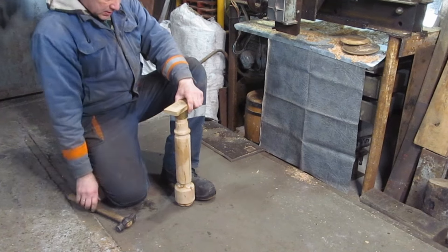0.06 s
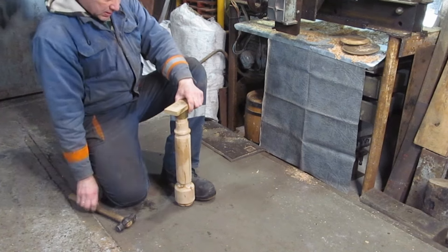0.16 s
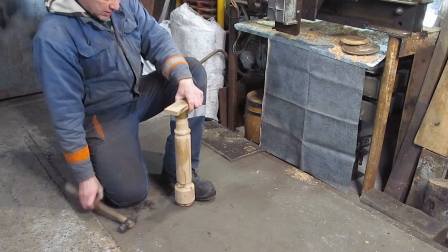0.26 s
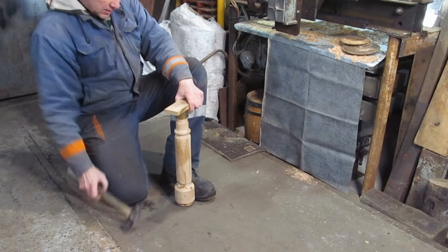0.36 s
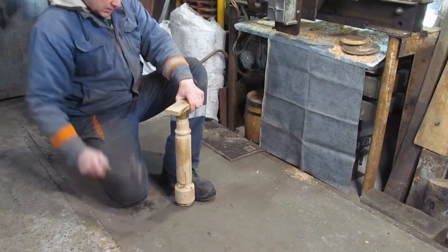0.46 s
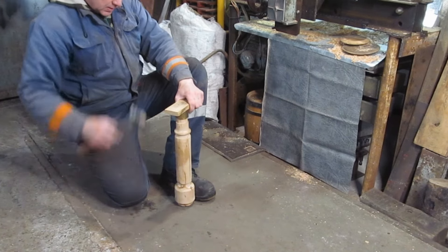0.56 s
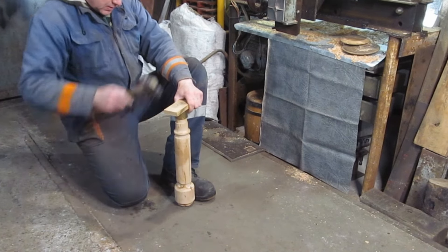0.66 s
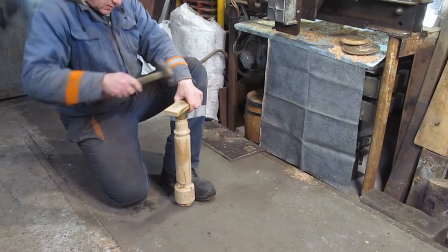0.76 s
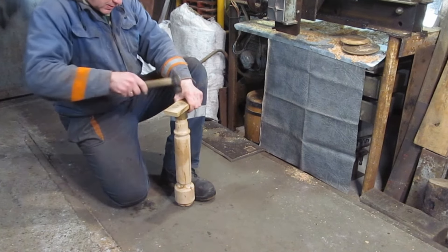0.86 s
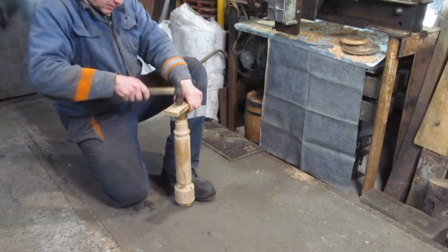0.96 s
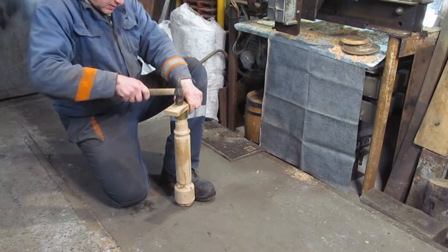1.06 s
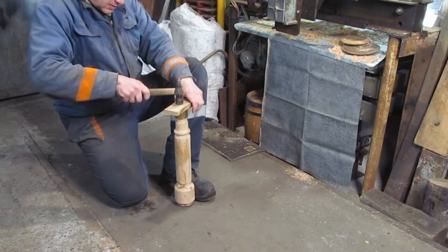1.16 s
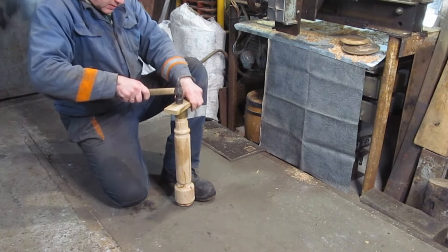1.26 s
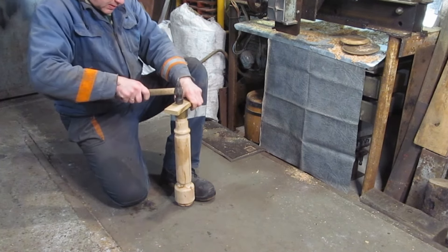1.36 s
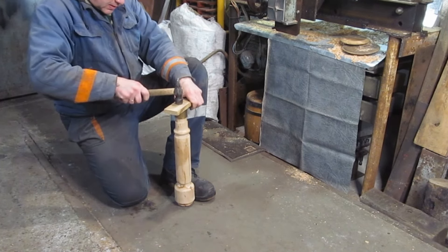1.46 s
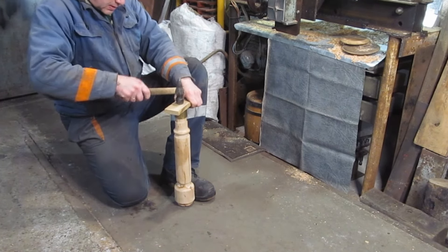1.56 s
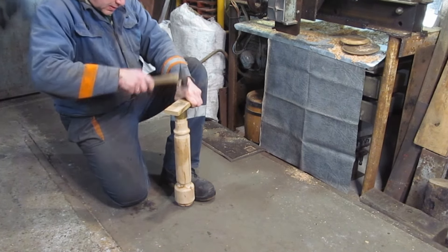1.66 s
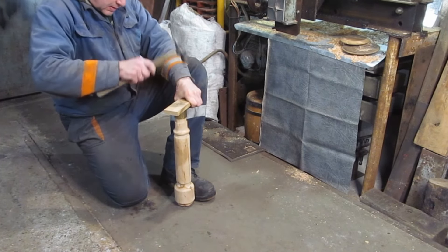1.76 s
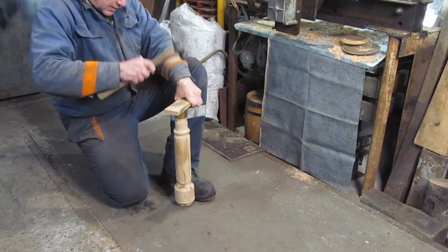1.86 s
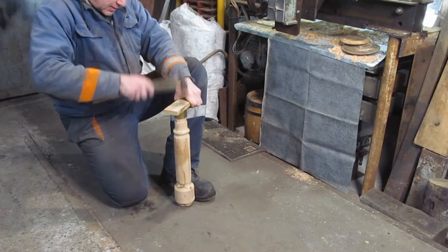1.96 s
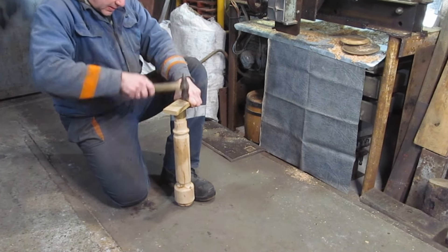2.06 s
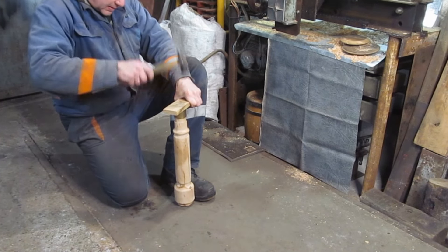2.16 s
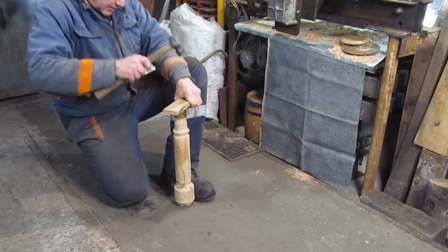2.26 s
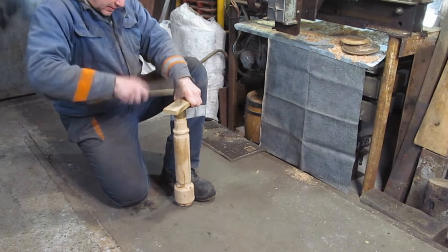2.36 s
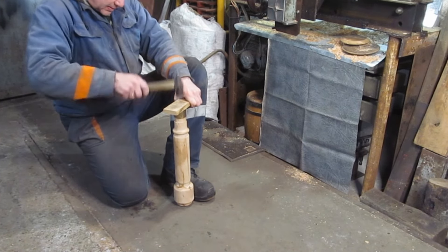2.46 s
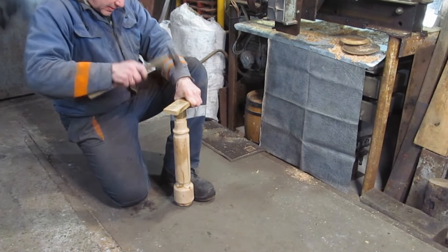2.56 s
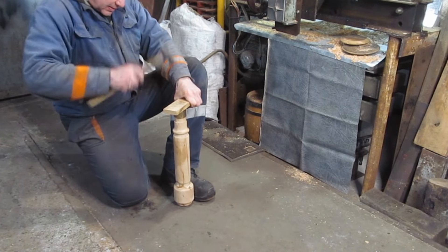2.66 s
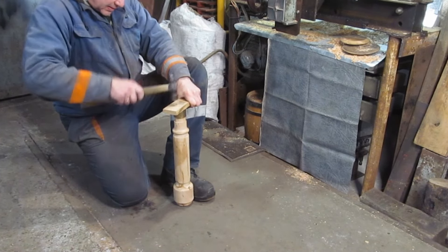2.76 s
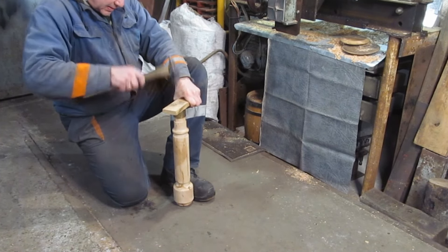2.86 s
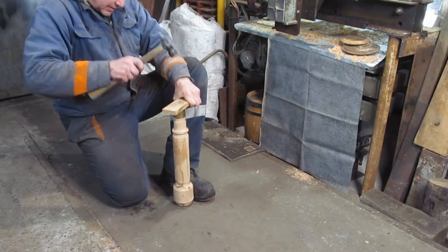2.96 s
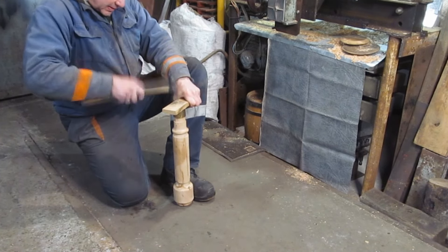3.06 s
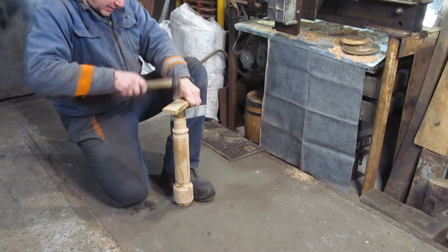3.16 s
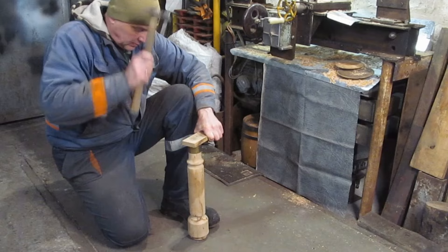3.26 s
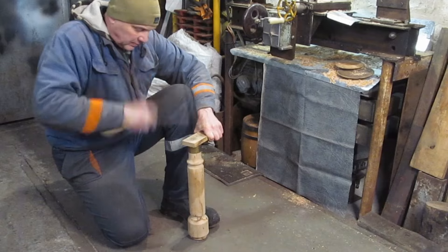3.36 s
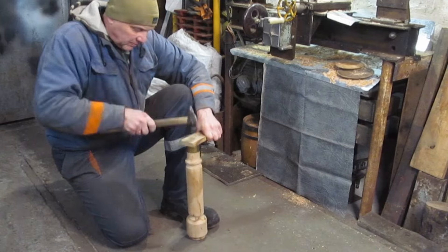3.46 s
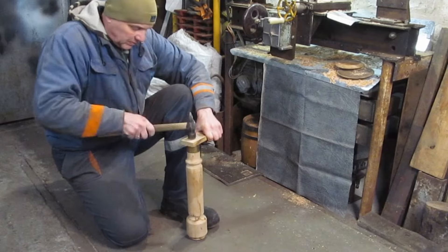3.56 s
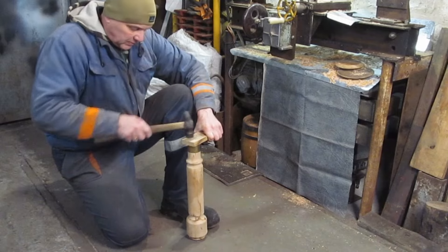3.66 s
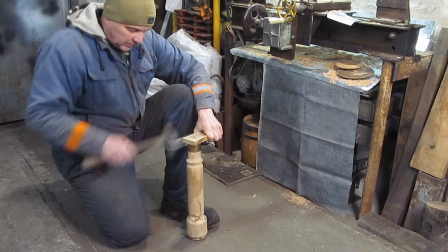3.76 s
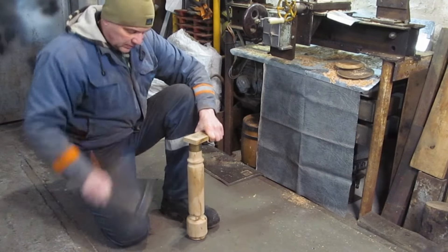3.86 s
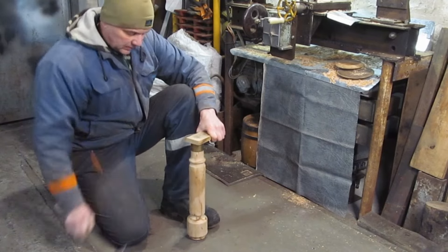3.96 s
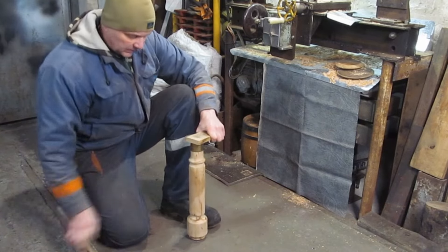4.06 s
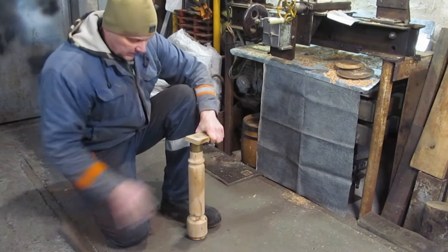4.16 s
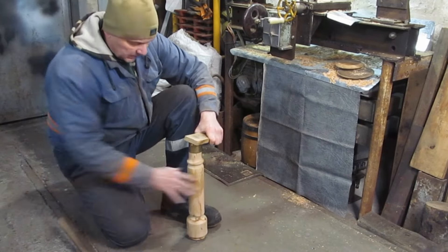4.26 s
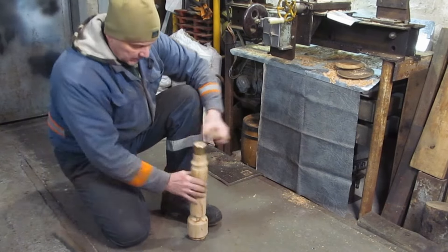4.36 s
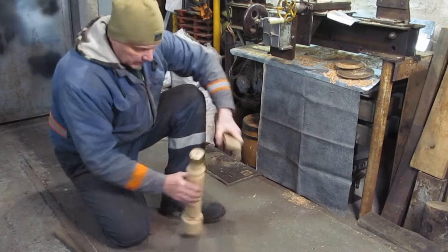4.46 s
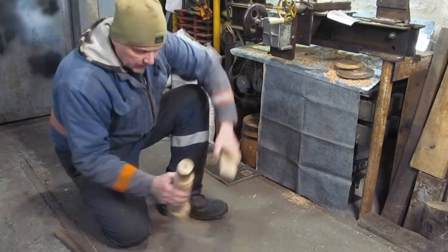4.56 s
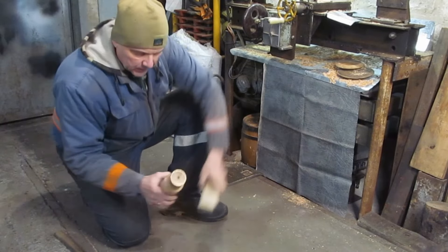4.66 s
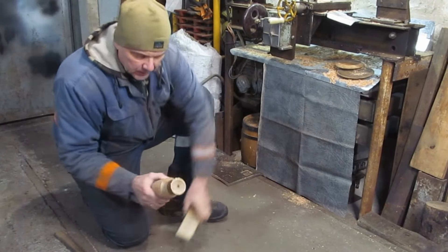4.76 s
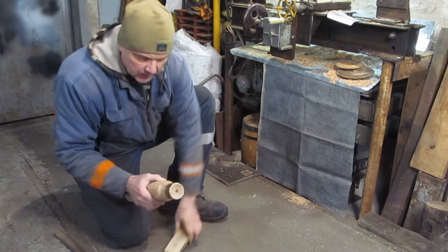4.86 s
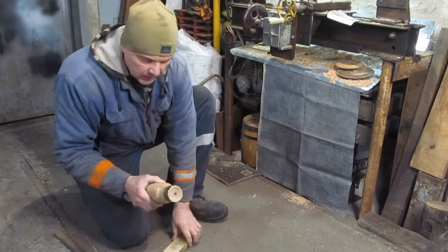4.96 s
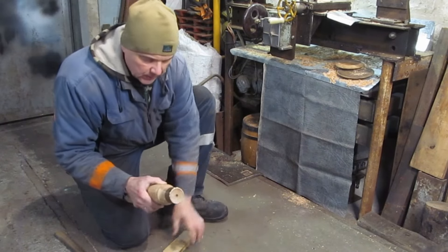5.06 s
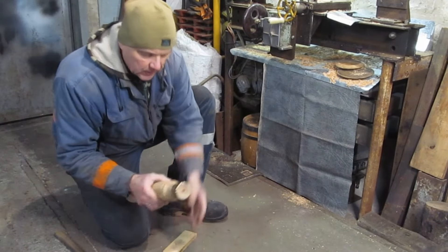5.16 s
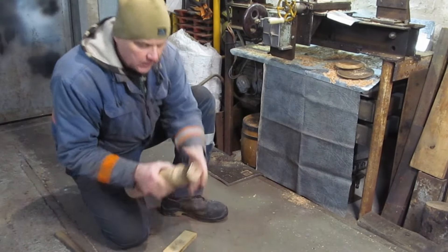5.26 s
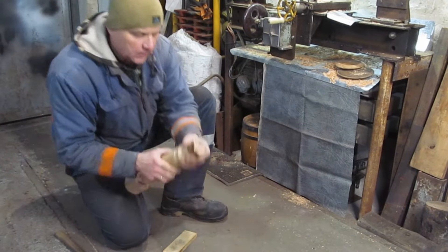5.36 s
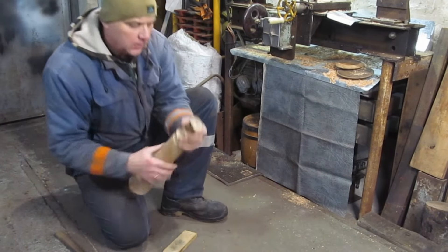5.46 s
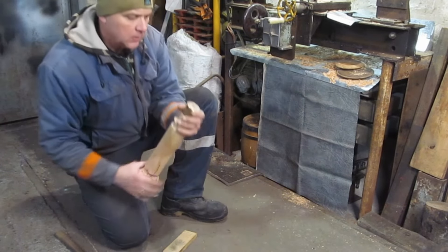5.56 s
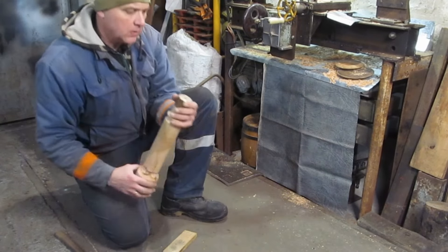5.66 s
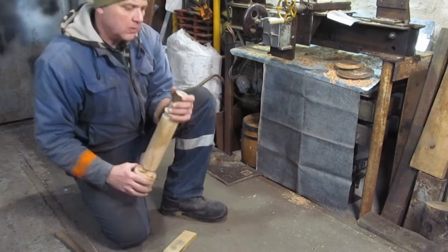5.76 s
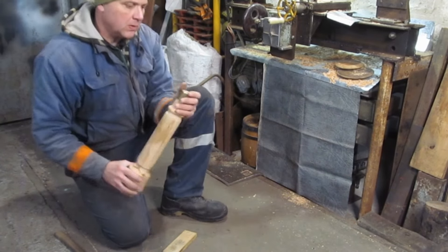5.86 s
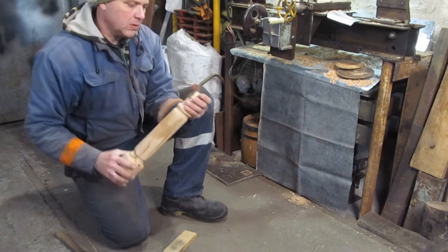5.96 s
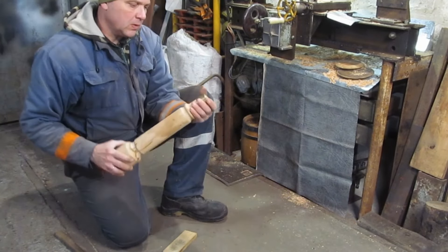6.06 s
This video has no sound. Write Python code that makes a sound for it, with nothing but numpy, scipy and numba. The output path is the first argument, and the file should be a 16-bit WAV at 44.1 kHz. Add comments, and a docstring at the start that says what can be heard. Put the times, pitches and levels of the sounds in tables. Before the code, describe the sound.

A gritty metal scrape, then six hammer blows on wood: the first softer, a pause, then five loud, dry cracks with short room echoes and a quick rebound after the last. The hammer is laid on concrete with clacks, the post's foot knocks, a small block drops and bounces, and fingers tap and brush wood. Faint hiss and far rumble, heard from a few metres.

```python
"""Hammering a wooden block in a garage

A worker drags a hammer off a concrete floor and drives six blows into a wooden block on a turned post,
then lays the hammer down, tips the post over, drops the block and handles the post. Knocks are damped
modes plus a noisy crack; rubbing is noise grains through ringing modes or a hiss band. A small cluttered
garage answers with diffuse echoes, over hiss and far rumble. The stereo microphone stands a few metres
away; its recorder clips the blows and turns its gain down after loud sound.
"""
import sys
import numpy as np
from scipy import signal
from scipy.fft import rfft, irfft, next_fast_len
from scipy.io import wavfile
from scipy.ndimage import uniform_filter1d
from numba import njit

SR = 44100
rng = np.random.default_rng(int(sys.argv[2]) if len(sys.argv) > 2 else 0)


def inscribe(sig):
    """Save sig as 16-bit PCM at rate SR to the path in sys.argv[1].

    A 1-D sig is mono; a 2-D sig holds one channel per row.
    Samples are clipped to [-1, 1] before scaling.
    """
    pcm = np.round(np.clip(np.atleast_2d(sig).T, -1, 1) * 32767)
    wavfile.write(sys.argv[1], SR, pcm.astype(np.int16))


N = 269835  # samples


def undb(db):
    """Amplitude factor of a level in dB."""
    return 10 ** (np.asarray(db) / 20)


def over_hz(table, hz):
    """Value of a (frequency_hz, value) table on a log-frequency axis."""
    table_hz, values = np.transpose(table)
    return np.interp(np.log(hz), np.log(table_hz), values)


def over_time(table):
    """Value of a (time_s, value) curve at every sample."""
    return np.interp(np.arange(N) / SR, *np.transpose(table))


def unit(x):
    """Scale to an RMS of 1."""
    return x / np.sqrt(np.mean(x ** 2))


# How alike left and right are: frequency_hz, correlation (0-1)
LEFT_RIGHT_LIKENESS = [(60, .6), (200, .95), (600, .88), (1500, .6), (3000, .45), (8000, .45), (16000, .3)]


def stereo_bands(size, shape):
    """Half-octave noise bands, partly alike left and right, each scaled by shape(hz)."""
    bin_hz = np.fft.rfftfreq(size, 1 / SR)
    out = np.zeros((2, size))
    noise = rfft(rng.standard_normal((2, size)))
    for hz in 25 * 2 ** np.arange(0, 10, .5):
        octaves_off = np.abs(np.log2(bin_hz / hz + 1e-9))
        mid, side = irfft(noise * np.clip(1 - octaves_off / .5, 0, 1), size)
        like = np.clip(over_hz(LEFT_RIGHT_LIKENESS, hz), 0, 1)
        out += shape(hz) * (np.sqrt(1 + like) * mid + np.sqrt(1 - like) * side * np.array([[1], [-1]]))
    return out


# Colour of the background hiss: frequency_hz, relative density_db
HISS_COLOUR = [(15, -38), (25, -11.5), (410, -9), (726, -1.5), (902, -10), (979, -5.5), (1220, -2),
               (1930, -9.5), (3700, -12), (7920, -23), (9080, -24), (15200, -29), (16500, -53)]
HISS_DB = -62.5  # RMS, before the left-right balance and the recorder's gain
# Far rumble coming and going: time_s, level_db
RUMBLE_LEVEL = [(0, -63), (.9, -71.5), (2, -68), (3.9, -60.5), (4.7, -70.5), (5.4, -79), (6.12, -100)]


def background():
    """Smooth hiss, and a far rumble centred on 150 Hz that comes and goes."""
    size = next_fast_len(N)
    hiss = unit(stereo_bands(size, lambda hz: undb(over_hz(HISS_COLOUR, hz))))[:, :N]
    rumble = unit(stereo_bands(size, lambda hz: np.exp(-np.log(hz / 150) ** 2 / .8)))[:, :N]
    return undb(HISS_DB) * hiss + undb(over_time(RUMBLE_LEVEL)) * rumble


# Decay of the garage: frequency_hz, t60_s
ROOM_DECAY = [(60, 0.87), (150, 0.43), (400, 0.33), (1000, 0.39), (2000, 0.34), (4000, 0.31), (7000, 0.37),
              (11000, 0.05), (16000, 0.033)]
# Colour of its echoes at their start: frequency_hz, relative level_db
ECHO_COLOUR = [(60, -5.5), (200, -1), (600, -6), (1500, -6), (3000, -5), (6000, -13.5), (10000, -13.5),
               (16000, -24.5)]
TAILS_STOP_S = 3.256  # echoes of everything before this moment stop short here


def garage(dry):
    """Diffuse echoes build up within a few ms and die sooner in the treble."""
    t = np.arange(SR) / SR
    tail = stereo_bands(SR, lambda hz: undb(over_hz(ECHO_COLOUR, hz) - 60 * t / over_hz(ROOM_DECAY, hz)))
    tail = tail * np.clip((t - .002) / 0.0014, 0, 1) * undb(-22.0)
    before = np.arange(N) < TAILS_STOP_S * SR
    fade = np.clip((TAILS_STOP_S + .006 - np.arange(N) / SR) / .012, 0, 1)
    early = signal.fftconvolve((dry * before)[None], tail, axes=1)[:, :N]
    late = signal.fftconvolve((dry * ~before)[None], tail, axes=1)[:, :N]
    return early * fade + late


def ring(x, modes):
    """Sum of damped resonances, neighbours in opposite sign."""
    out = 0
    for k, (hz, width_hz, db) in enumerate(modes):
        r = np.exp(-np.pi * width_hz / SR)
        w = 2 * np.pi * hz / SR
        mode = signal.lfilter([0, np.sin(w)], [1, -2 * r * np.cos(w), r * r], x)
        out = out + (-1) ** k * undb(db) * mode
    return out


def grains(spread_db):
    """Dense clicks of very uneven size."""
    return rng.standard_normal(N) * undb(spread_db * rng.exponential(size=N))


def strokes(table, attack_s, release_db_s):
    """Gain of rubbing strokes: a ramp up, a hold, a fade in dB per s."""
    t = np.arange(N) / SR
    out = 0
    for start_s, hold_s, db in table:
        fading_s = np.maximum(t - start_s - attack_s - hold_s, 0)
        out = out + np.clip((t - start_s) / attack_s, 0, 1) * undb(db - release_db_s * fading_s)
    return out


def rubbing_hiss():
    """Skin or cloth over a surface: uneven grains heard from 2.5 to 11 kHz."""
    band = signal.butter(2, [2500, 11000], "bandpass", fs=SR, output="sos")
    return unit(signal.sosfilt(band, grains(3.6)))


# Sleeve swishing as the arm moves: start_s, hold_s, level_db
SLEEVE_STROKES = [(0, 0.44, -67.5), (.45, .14, -65), (.62, .27, -72), (2.275, 0.036, -64),
                  (2.63, 0.012, -69.5), (3.895, 0.026, -71)]


def sleeve():
    """Cloth hisses as the arm moves."""
    return strokes(SLEEVE_STROKES, 0.0088, 900) * rubbing_hiss()


# Hands over the wood: start_s, hold_s, level_db
HAND_STROKES = [(5.243, 0.019, -72), (5.305, .04, -68), (5.365, .022, -70), (5.437, 0.058, -56.5),
                (5.545, 0.029, -67), (5.698, 0.049, -69.5), (5.91, 0.17, -89)]
# Swells of a hollow tone near 1 kHz: start_s, hold_s, level_db
HOLLOW_SWELLS = [(5.25, 0.034, -76), (5.52, 0.056, -66.5), (5.82, 0.068, -73), (5.99, .13, -83)]
# Ringing of the lifted, free post: pitch_hz, width_hz, level_db
LIFTED_POST_MODES = [(968, 43, -6), (1518, 360, 0.5), (2116, 43, 5.5), (2730, 350, -3.5), (6550, 900, -11)]


def hands():
    """Skin hisses over the wood and wakes its ring, while a hollow tone swells."""
    rub = rubbing_hiss() + undb(-8.5) * unit(ring(grains(2.0), LIFTED_POST_MODES))
    hollow = unit(ring(grains(1.8), [(1034, 21, 0)]))
    return strokes(HAND_STROKES, 0.011, 440) * rub + strokes(HOLLOW_SWELLS, 0.018, 330) * hollow


# Hammer dragged free: start_s, hold_s, level_db
DRAG_STROKES = [(.18, .08, -44), (.33, .05, -59.5)]
# Head first sliding, fingers on the handle: start_s, hold_s, level_db
SCRAPE_STROKES = [(.022, .028, -49.5), (.085, .04, -52)]
# Hammer ringing on the concrete: pitch_hz, width_hz, level_db
HAMMER_MODES = [(163, 98, -10.5), (280, 94, -16), (458, 92, -4.5), (1100, 310, 2), (1880, 102, 2.5),
                (3128, 89, 0.5), (3967, 420, -9), (4900, 200, -8)]
# Hammer ringing under the hand: pitch_hz, width_hz, level_db
HELD_HAMMER_MODES = [(490, 61, 2), (890, 62, -9), (2120, 60, 0), (3250, 80, -14), (3520, 110, -9)]


def hammer_drag():
    """Grit on the floor excites the ring of the hammer."""
    rounded_grit = signal.lfilter([1], [1, -.9], grains(5.1))  # the weight rounds the grit
    drag = strokes(DRAG_STROKES, 0.024, 400) * unit(ring(rounded_grit, HAMMER_MODES))
    return drag + strokes(SCRAPE_STROKES, 0.0137, 450) * unit(ring(grains(3.9), HELD_HAMMER_MODES))


def knock(modes, contact_ms, crack_db, crush_ms, grit):
    """One contact, direct peak 1. Rows: direct sound, then its ring and crack averaged over all directions."""
    t = np.arange(SR // 5) / SR
    # the surface gives way for a few ms
    crush = rng.standard_normal((2, len(t))) * np.exp(-(t * 1000 / crush_ms) ** 4)
    push = 1. * (t == 0)
    keep = np.exp(-2 * np.pi * 1000 / (SR * max(contact_ms, .02)))  # longer contact, duller sound
    forces = [push + grit * crush[0], push, crush[1], push]
    parts = signal.lfilter([1], np.poly([keep] * 3), forces)
    parts[:2] = ring(parts[:2], modes)
    parts[2:] = np.diff(parts[2:], prepend=0)  # the surface radiates its acceleration
    energy = np.sum(parts ** 2, axis=1, keepdims=True)
    parts = parts / np.sqrt(energy) * undb([[0], [0], [crack_db], [crack_db]])
    direct = parts[0] + parts[2]
    return np.array([direct, parts[1], parts[3]]) / np.abs(direct).max()


def add(track, s, sound):
    """Mix a sound into the track from second s on."""
    i = int(s * SR)
    track[:, i:i + sound.shape[1]] += sound[:, :N - i]


SPOT_SPREAD = .2  # random shift of each mode at a new contact spot, as a share of its width
TAP_CRACK_GROWTH = 0.28  # extra crack dB per dB of contact level


def taps(table, modes, crack_db, growth, crush_ms, grit, room_db):
    """Light contacts of one object; the crack's share changes by growth dB per dB of level."""
    out = np.zeros((3, N))
    for s, db, contact_ms in table:
        shifted = np.array(modes, dtype=float)
        shift = np.clip(rng.standard_normal(len(modes)), -2, 2)
        shifted[:, 0] += SPOT_SPREAD * shifted[:, 1] * shift
        add(out, s, undb(db) * knock(shifted, contact_ms, crack_db + growth * db, crush_ms, grit))
    return out * undb([[0], [room_db], [room_db]])


# Fingers tapping the lifted post: start_s, peak level_db, contact_ms
FINGER_CONTACTS = [(5.127, -52.5, .14), (5.368, -44.5, .14), (5.380, -47, 0.17), (5.535, -27.5, 0.21)]


def finger_taps():
    """Fingers wake the modes of the free post; softer taps have a larger share of crack."""
    return taps(FINGER_CONTACTS, LIFTED_POST_MODES, -39.5, -0.96, 2.8, 0.11, -13.5)


# Loose block landing and bouncing: start_s, peak level_db, contact_ms
BLOCK_CONTACTS = [(4.824, -12, 0.48), (4.875, -7.5, 0.56), (4.888, -8.5, 0.32), (4.901, -19, 0.38),
                  (4.922, -34, .36), (4.940, -19.5, 0.11)]
# Ringing of the loose block: pitch_hz, width_hz, level_db
BLOCK_MODES = [(666, 630, -22), (1010, 550, -8.5), (1584, 210, -5.5), (1900, 88, -5), (2098, 36, -3.5),
               (2215, 38, 2), (2836, 180, 2), (3270, 520, 1.5), (5030, 1700, 4.5)]
GRIP_DAMPING = 5.  # the fingers widen the block's modes this many times at its first landing


def block():
    """First landing damped by the fingers, then free bounces."""
    gripped = np.array(BLOCK_MODES) * [1, GRIP_DAMPING, 1]
    landing = taps(BLOCK_CONTACTS[:1], gripped, -5.5, TAP_CRACK_GROWTH, 0.73, 0.64, -3)
    return landing + taps(BLOCK_CONTACTS[1:], BLOCK_MODES, -11.5, TAP_CRACK_GROWTH, 0.69, 0.32, -4.5)


# Foot of the post landing on the concrete: start_s, peak level_db, contact_ms
POST_CONTACTS = [(4.322, -6, 0.17), (4.329, -7, 0.25), (4.431, -18.5, 0.63), (4.494, -31.5, 1),
                 (4.528, -33, 1)]
# Ringing of the tipped post: pitch_hz, width_hz, level_db
POST_MODES = [(655, 110, -12), (823, 246, -5.5), (1920, 650, 3), (3020, 460, 2), (5260, 850, -2.5)]


def post():
    """The foot lands, then rocks softly to rest."""
    return taps(POST_CONTACTS, POST_MODES, -7.5, TAP_CRACK_GROWTH, 0.54, .12, -5)


# Hammer touching the concrete: start_s, peak level_db, contact_ms
HAMMER_CONTACTS = [(.211, -25.5, 1), (.221, -29.5, 0.97), (.254, -35.5, 0.9), (3.959, -9.5, 0.48),
                   (3.979, -4.5, 0.69), (3.988, -11.5, 0.53), (4.036, -25, 0.2), (4.127, -23.5, 0.32),
                   (4.134, -15.5, 0.18), (4.141, -9.5, 0.27)]


def hammer_on_floor():
    """Hammer contacts on concrete as it is picked up and laid down wake its modes."""
    return taps(HAMMER_CONTACTS, HAMMER_MODES, -2, TAP_CRACK_GROWTH, 2.9, 0.22, -1.5)


# Head falling back on the block: start_s, peak level_db, contact_ms
REBOUND_CONTACTS = [(3.471, -8, 0.18), (3.484, -13, .25)]
# Ringing of the block on the post: pitch_hz, width_hz, level_db
STACK_MODES = [(1126, 420, 0), (1897, 120, -5), (2350, 330, -1.5), (2950, 280, -0.5), (4440, 600, -1),
               (4750, 140, -7), (6600, 320, -7.5), (9500, 2000, -17.5)]


def rebound():
    """The head falls back on the block and wakes the stack again."""
    return taps(REBOUND_CONTACTS, STACK_MODES, -20.5, TAP_CRACK_GROWTH, 2.4, 0.34, -1)


# Hammer blows on the block: start_s, strength_db, contact_ms, bending ring change_db, face ring change_db
HAMMER_BLOWS = [(.921, 3.5, 0.58, 5, -10), (1.938, 9, 0.33, -5, 6), (2.324, 10.5, 0.34, -2.5, -3),
                (2.677, 11, 0.33, 4, 4), (3.022, 11, 0.27, -0.5, 1.5), (3.336, 13, 0.24, -3.5, 6.5)]
# Post thudding on the slab: pitch_hz, width_hz, level_db
THUD_MODES = [(183, 81, -3.5), (453, 74, -3)]
# Each pair: dB for a 0 dB blow, extra dB per dB of strength
CRACK_DB, CRACK_GROWTH = -12.5, 1.184
THUD_DB, THUD_GROWTH = -28.5, .9
BLOW_ROOM_DB, ROOM_GROWTH = -11, 0.77  # share sent round the room


def blows():
    """Steel on wood: each spot wakes the modes differently; harder blows crack, thud and fill the room more."""
    out = np.zeros((3, N))
    for s, db, contact_ms, bend_db, face_db in HAMMER_BLOWS:
        modes = np.array(STACK_MODES, dtype=float)
        modes[1, 2] += bend_db
        modes[4:6, 2] += face_db
        strike = knock(modes, contact_ms, CRACK_DB + CRACK_GROWTH * db, 2.2, 0.56)
        thud = undb(THUD_DB + THUD_GROWTH * db) * knock(THUD_MODES, 0.76, -30, 4.3, 0.04)
        room_db = BLOW_ROOM_DB + ROOM_GROWTH * db
        add(out, s, undb(db) * (strike + thud) * undb([[0], [room_db], [room_db]]))
    return out


OFF_AXIS_HZ = 6500  # the housing dulls the direct sound of the contacts above this
PORT_LAG = .6  # samples by which the right microphone port lags
BASS_CUT_HZ = 240
LEFT_DB = -3.8  # left level relative to right


def scene():
    """Contacts and rubbing, direct and from the room, over the background."""
    rubbing = hammer_drag() + sleeve() + hands()
    contacts = blows() + rebound() + hammer_on_floor() + post() + block() + finger_taps()
    near, rings, cracks = contacts
    near = signal.lfilter(*signal.butter(1, OFF_AXIS_HZ, fs=SR), near) + rubbing
    right = np.interp(np.arange(N) - PORT_LAG, np.arange(N), near)
    near = np.array([near, right])
    work = near + garage(rings + undb(-4.0) * rubbing) + garage(cracks)
    # small objects radiate little deep bass
    work = signal.sosfilt(signal.butter(2, BASS_CUT_HZ, "highpass", fs=SR, output="sos"), work)
    return (work + background()) * undb([[LEFT_DB / 2], [-LEFT_DB / 2]])


@njit
def gain_db(level_db, top_db, fall, rise):
    """Gain drops the faster the louder the output, and creeps back up to 0 dB."""
    out, g = np.empty(len(level_db)), 0.
    for i in range(len(level_db)):
        excess = level_db[i] + g - top_db
        g = g - fall * excess / SR if excess > 0 else min(g + rise / SR, 0.)
        out[i] = g
    return out


GAIN_TOP_DB = -20  # output level above which the gain falls
GAIN_FALL, GAIN_RISE = 62, 7.1  # fall in dB/s per dB of excess; rise in dB/s
CLIP = .9  # amplitude
TOP_HZ = 16600  # steep top cut


def record(dry):
    """Automatic gain, hard clipping, steep top cut."""
    power = uniform_filter1d(np.mean(dry ** 2, axis=0), size=88, origin=43)  # 2 ms mean
    level_db = 10 * np.log10(power + 1e-12)
    gain = undb(gain_db(level_db, 1. * GAIN_TOP_DB, GAIN_FALL, GAIN_RISE))
    clipped = np.clip(dry * gain, -CLIP, CLIP)
    top_cut = signal.ellip(8, .2, 60, TOP_HZ, fs=SR, output="sos")
    return np.clip(signal.sosfilt(top_cut, clipped), -1, 1)


dry = scene()
out = record(dry)
inscribe(out)
```